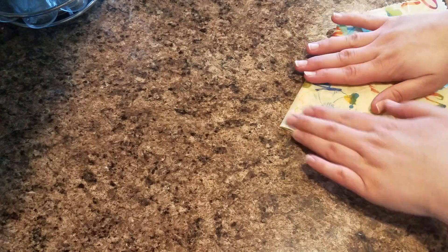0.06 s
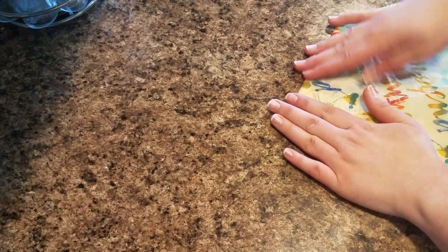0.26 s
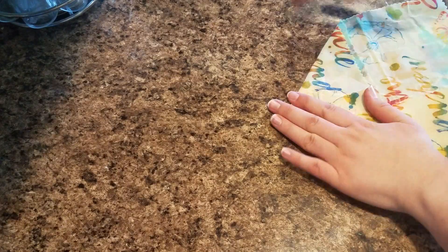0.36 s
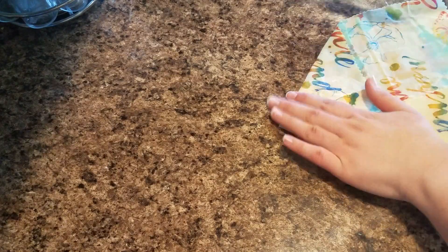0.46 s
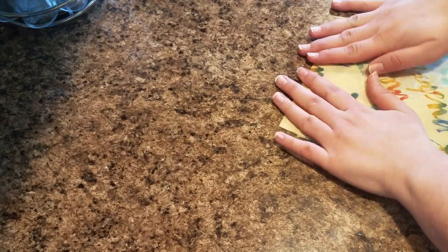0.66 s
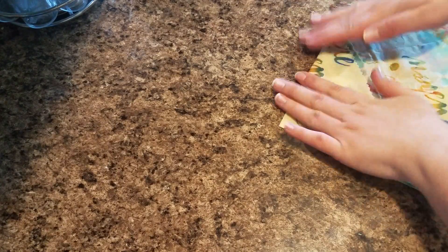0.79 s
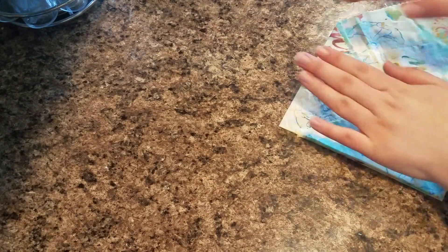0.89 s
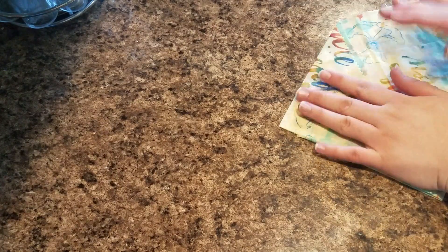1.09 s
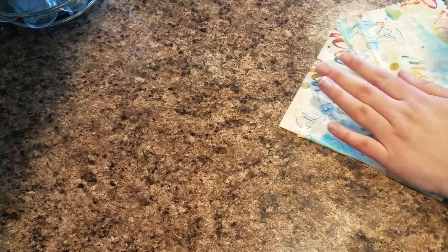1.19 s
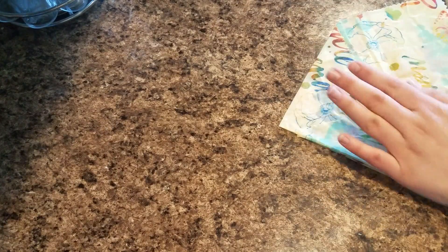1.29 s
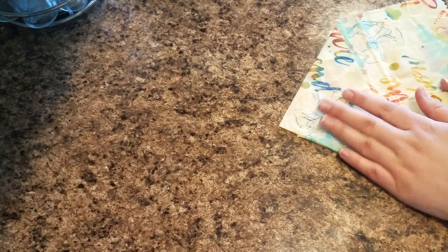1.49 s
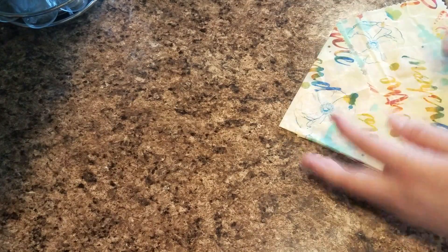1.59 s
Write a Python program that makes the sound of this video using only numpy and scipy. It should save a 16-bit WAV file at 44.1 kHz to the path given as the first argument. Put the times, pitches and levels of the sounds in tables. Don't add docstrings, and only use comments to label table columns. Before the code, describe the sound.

Soft palm thumps and crinkly fingertip ticks on waxed cloth over a kitchen counter, humming room

```python
import sys
import numpy as np
from scipy import signal
from scipy.fft import rfft, irfft, next_fast_len
from scipy.io import wavfile
from scipy.ndimage import uniform_filter1d

SR = 44100
rng = np.random.default_rng(int(sys.argv[2]) if len(sys.argv) > 2 else 0)


def wrap_up_sound(samples):
    columns = np.atleast_2d(samples).T
    tamed = np.clip(columns, -1, 1)
    steps = np.round(tamed * 32767).astype(np.int16)
    wavfile.write(sys.argv[1], SR, steps)


def nominal_scale(level):
    x = np.asarray(level, float) / 20
    return 10 ** x


N = 72765


def unit_rms(x):
    return x / np.sqrt(np.mean(abs(x) ** 2) + 1e-20)


def read_curve(points, hz):
    f, value = np.transpose(points)
    return np.interp(np.log(hz + 1), np.log(f + 1), value)


def add(mix, start_s, sound):
    part = mix[max(round(start_s * SR), 0):][:len(sound)]
    part += sound[:len(part)]


def resonate(x, hz, width_hz):
    r = np.exp(-np.pi * width_hz / SR)
    return signal.lfilter([1 - r, 0, r - 1], [1, -2 * r * np.cos(2 * np.pi * hz / SR), r * r], x)


def colour(x, gain_db):
    size = next_fast_len(2 * N)
    gain = nominal_scale(gain_db(np.fft.rfftfreq(size, 1 / SR)))
    return irfft(rfft(x, size) * gain, size)[..., :N]


# f/Hz, density/dB per Hz
AIR_SPECTRUM = [(22, -33), (60, -1.5), (128, 1), (242, -5.5), (480, -11), (1100, -20), (3000, -31),
                (8000, -43.5)]
# f/Hz, correlation/1
AIR_LIKENESS = [(60, 1), (180, 0.89), (550, 0.12), (1650, -0.085), (4970, -0.15), (15000, 0.039)]


def air():
    level_db, patch_db = -49.5, 1.07
    hz = np.fft.rfftfreq(1024, 1 / SR)
    a, b, c, d, patches = rng.standard_normal((N // 256 + 5, 513, 5)).T
    patches = uniform_filter1d(patches, size=14, axis=0)
    patches = unit_rms(uniform_filter1d(patches, size=10, axis=1))
    same = read_curve(AIR_LIKENESS, hz)[:, None]
    left = a + 1j * b
    right = same * left + np.sqrt(1 - same ** 2) * (c + 1j * d)
    gain = nominal_scale(read_curve(AIR_SPECTRUM, hz)[:, None] + patch_db * patches)
    noise = signal.istft(np.array([left, right]) * gain, nperseg=1024, noverlap=768)[1]
    return nominal_scale(level_db) * unit_rms(noise[:, :N])


# f/Hz, level/dB rms, waver width/Hz, left-right likeness/1
HUM_TONES = [(58.2, -60, 3.1, 1), (119, -50.5, 15.4, 1), (147.4, -56.5, 25, 0.99), (245.2, -74, 7, 0.76),
             (290.8, -60, 13.7, 0.89), (389.2, -62, 26, 0.76), (408.5, -62.5, 1.6, 0.57),
             (477.7, -63.5, 4.1, 0.58), (583.6, -71.5, 6.4, 0.2)]


def hum():
    steady = .75
    t = np.arange(N) / SR
    out = np.zeros((2, N))
    for hz, db, width_hz, same in HUM_TONES:
        r = np.exp(-np.pi * width_hz / SR)
        n = rng.standard_normal((2, 2, 2 * N))
        waver = signal.lfilter([1 - r], [1, -r], n[0] + 1j * n[1])
        waver = signal.lfilter([1 - r], [1, -r], waver)[:, N:]
        phase = np.exp(2j * np.pi * rng.random((2, 1)))
        z = steady * phase + (1 - steady) * unit_rms(waver)
        z[1] = same * z[0] + np.sqrt(1 - same ** 2) * z[1]
        out += nominal_scale(db) * unit_rms((z * np.exp(2j * np.pi * hz * t)).real)
    return out


# t/s, peak level/dB, f/Hz, t60/s
FAR_TAP = (1.6243, -44, 900, .035)


def far_tap():
    rise_s = 0.0042
    start_s, db, hz, t60_s = FAR_TAP
    t = np.arange(SR // 10) / SR
    out = np.zeros(N)
    envelope = nominal_scale(db - 60 * t / t60_s) * np.minimum(t / rise_s, 1)
    add(out, start_s, envelope * 2 * np.sin(2 * np.pi * hz * t))
    return out


# t/s, length/s, level/dB, brightness/dB
STROKES = [(0, 0.048, -59, 5), (0.076, 0.017, -64.5, 2.5), (0.213, 0.034, -58, -0.5),
           (0.24, 0.036, -58.5, -4), (0.275, 0.02, -61, -6), (0.435, 0.011, -57, -6),
           (0.485, 0.013, -72.5, 13), (0.498, 0.017, -62.5, 3.5), (0.553, 0.04, -62, -6),
           (0.637, 0.011, -51, -0.5), (0.654, .022, -53.5, -2.5), (0.753, 0.031, -62.5, -5),
           (0.783, 0.04, -59, -1), (0.97, 0.018, -54, -9), (.979, 0.02, -44.5, -7.5),
           (0.984, 0.018, -56, -12), (1.027, 0.056, -58, -11), (1.199, 0.029, -61, 2.5),
           (1.229, 0.054, -62.5, 2), (1.383, 0.018, -54, -8), (1.4, 0.03, -49.5, -7),
           (1.43, 0.043, -88, -3), (1.533, 0.066, -64, 1)]
# f/Hz, density/dB per Hz
CLOTH_SPECTRUM = [(290, -19), (500, -3.5), (960, -7), (1820, -4.5), (5230, -21), (6320, -24.5),
                  (9760, -16.5), (14900, -25), (16000, -36)]


def skin():
    rise, fall = 0.042, 0.5
    grains_per_s, grain_db, smooth = 2700, 4.5, 0.64
    dull, bright = np.zeros(N), np.zeros(N)
    for start_s, length_s, db, bright_db in STROKES:
        u = np.arange(0, 1, 1 / (length_s * SR))
        shape = nominal_scale(db) * np.minimum(np.minimum(u / rise, 1), (1 - u) / fall)
        add(dull, start_s, shape)
        add(bright, start_s, shape * nominal_scale(bright_db))
    size = nominal_scale(grain_db * np.minimum(rng.exponential(1, (2, N)), 2))
    size = size * (rng.random((2, N)) < grains_per_s / SR)
    grains = rng.standard_normal((2, N)) * (smooth + unit_rms(size))
    cloth = unit_rms(colour(grains, lambda f: read_curve(CLOTH_SPECTRUM, f) - 40 * (f < 450)))
    low = signal.sosfiltfilt(signal.butter(4, 7000, fs=SR, output="sos"), cloth)
    return low * dull + (cloth - low) * bright


# t/s, peak level/dB, start f/Hz, length/s
POCKETS = [(.9815, -41.5, 612, 0.0178), (.988, -34, 317, 0.018), (0.23, -48, 598, 0.024),
           (0.643, -44.5, 580, 0.013), (1.024, -48, 420, 0.0095), (.979, -39, 1195, 0.019),
           (.2115, -47, 1550, .009), (1.3865, -47, 1800, .006), (.697, -40, 70, .04),
           (1.384, -44.5, 574, .015), (1.41, -45, 533, 0.013)]


def pockets():
    fall, roughness, small_hz = 0.72, 0.26, 640
    out = np.zeros(N)
    for start_s, db, hz, length_s in POCKETS:
        n = rng.standard_normal(SR // 20)
        u = np.arange(0, 1, 1 / (length_s * SR))
        slide = 1 - fall * u * min(small_hz / hz, 1) ** 3
        turns = np.cumsum(hz * slide) / SR
        rough = 1 + roughness * unit_rms(uniform_filter1d(n, size=60))[:len(u)]
        swell = np.sin(np.pi * u ** 0.68) ** 2
        add(out, start_s, nominal_scale(db) * swell * rough * np.sin(2 * np.pi * turns))
    return out


# t/s, peak level/dB, colour f/Hz, t60/s
TICKS = [(0.084, -60, 1400, 0.017), (0.125, -46.5, 1770, .03), (0.214, -44, 1450, 0.05),
         (0.2127, -54, 1740, 0.025), (0.2257, -44, 1900, .04), (.232, -46, 1590, .04),
         (0.2162, -40, 3800, 0.024), (0.219, -46, 1830, 0.049), (0.2709, -41.5, 2240, 0.05),
         (.44, -56, 2500, .03), (.219, -52, 540, 0.042), (.487, -53, 3930, 0.052),
         (0.502, -45.5, 1570, 0.022), (0.5548, -52, 1570, 0.082), (0.569, -45.5, 1920, 0.051),
         (0.6401, -36.5, 2670, 0.032), (0.6412, -42, 1350, 0.024), (0.6472, -32, 2600, 0.014),
         (.659, -45.5, 2560, 0.051), (0.664, -48, 2500, .04), (.969, -41.5, 1730, 0.13),
         (0.9816, -37.5, 2500, 0.024), (0.9819, -39, 1070, 0.031), (.988, -38, 2330, 0.027),
         (1.049, -51.5, 1810, 0.033), (1.2082, -63, 2380, 0.043), (1.3828, -39, 914, 0.11),
         (1.3882, -41, 1770, 0.22), (1.393, -45, 4700, 0.025), (1.406, -44, 1730, 0.08),
         (0.9703, -35, 1000, .05), (0.2212, -38, 1030, .05), (0.2704, -40.5, 1210, .03),
         (.5018, -46.5, 1020, .03), (0.567, -51, 1100, 0.038), (0.433, -55, 1197, 0.025),
         (0.4648, -68, 1430, 0.024), (0.5453, -57, 1210, 0.036), (0.7626, -58, 1490, .03),
         (0.649, -58, 5000, .02), (0.675, -49.5, 1980, 0.034), (1.384, -52, 2300, 0.047),
         (1.3904, -53, 2600, 0.045), (1.397, -50, 2100, 0.037), (1.402, -58, 2300, .04),
         (1.409, -40, 1490, .04), (1.4138, -49, 2200, 0.032), (1.03, -58, 3300, .03),
         (1.415, -59, 2920, 0.027), (1.42, -42, 457, 0.26)]


def fingertips():
    relative_width, crisp_hz, soft_hz = .55, 2000, 640
    rustle_db, broad_db, air_db, pad_db = -25, -1, -21, 6
    t = np.arange(SR // 10) / SR
    out = np.zeros(N)
    for start_s, db, hz, t60_s in TICKS:
        rustle = rng.standard_normal(len(t)) ** 3 / 4 * nominal_scale(rustle_db - 60 * t / t60_s)
        drive = rustle + (t == 0)
        sharp = min(hz / crisp_hz, 1)
        ring = resonate(drive, hz, relative_width * max(sharp * hz, soft_hz))
        ring = resonate(ring, hz, 2 * hz)
        broad = nominal_scale(broad_db) * resonate(drive, 3800, 4500)
        broad += nominal_scale(air_db) * resonate(drive, 10000, 7000)
        broad += nominal_scale(pad_db) * resonate(drive, 1100, 800)
        add(out, start_s, nominal_scale(db) * (ring / abs(ring).max() + broad * sharp ** 2))
    return out


# t/s, peak level/dB, ring f/Hz, damping/s
THUMPS = [(.216, -33, 88, .05), (.211, -31, 160, .012), (.2172, -29.5, 160, .012), (.2803, -32, 150, .014),
          (.569, -37, 89, .04), (.6354, -32, 120, .012), (.6437, -21, 120, .013), (.6605, -28, 119, .017),
          (.651, -34, 190, .014), (.712, -36, 118, .025), (.76, -39, 165, .02), (.9865, -20, 100, .02),
          (.9965, -26, 100, .015), (.991, -30, 180, .016), (.985, -37, 50, .04), (1.0405, -27.5, 110, .03),
          (1.077, -38, 108, .02), (1.3945, -35, 140, .018), (1.4168, -29, 125, .013),
          (1.4175, -38, 186, .015), (1.40, -45, 40, .04), (1.642, -34, 120, .012), (1.017, -37, 72, .04),
          (1.478, -39, 116, .025)]


def counter():
    rise_s, after_db, after_t60_s, port_lag_s = .004, -30, .25, .00018
    t = np.arange(SR // 3) / SR
    out = np.zeros(N)
    for start_s, db, hz, damp_s in THUMPS:
        fade = np.exp(-(t / damp_s) ** 2) + nominal_scale(after_db - 60 * t / after_t60_s)
        swell = 1 - np.exp(-t / rise_s)
        add(out, start_s, nominal_scale(db) * swell * fade * np.sin(2 * np.pi * hz * t))
    late = np.interp(np.arange(N) - port_lag_s * SR, np.arange(N), out)
    return np.array([out, late])


# delay/s, left gain/1, right gain/1
ECHOES = [(.00025, 0.0076, 0.14), (.00045, -0.083, 0.27), (.0007, -0.075, 0.1), (.0016, 0.22, -0.37),
          (.0026, 0.31, .2)]


def room(x):
    tail_db, t60_s, port_lag_s = -9, .2, .00005
    size = SR // 2
    taps = np.zeros((2, size))
    at = np.arange(200, size - 20, 20) + rng.integers(0, 20, (2, (size - 201) // 20))
    np.put_along_axis(taps, at, rng.choice([-1., 1.], at.shape), 1)
    taps *= nominal_scale(-60 * np.arange(size) / SR / t60_s)
    taps *= nominal_scale(tail_db) / np.linalg.norm(taps[0])
    for delay_s, left, right in ECHOES:
        taps[:, round(delay_s * SR)] += left, right
    taps[0, 0] = taps[1, round(port_lag_s * SR)] = 1
    return signal.fftconvolve(x, taps, axes=1)[:, :N]


def scene():
    background = air() + hum() + far_tap()
    cloth = room(skin()) + room(fingertips()[None])
    return background + cloth + pockets() + counter()


def top_cut(x):
    return signal.sosfilt(signal.butter(12, 16120, fs=SR, output="sos"), x)


# f/Hz, gain/dB
MIC_RESPONSE = [(3000, 0.8), (4800, -0.5), (6000, -1), (8300, -2), (9500, 3.5), (16000, 6.5)]
# f/Hz, left minus right/dB
MIC_BALANCE = [(60, .7), (150, .2), (500, -.4), (2000, -.5), (5000, .5), (14000, 2)]


def record(dry):
    edge_hz = 15810

    def port(x, side):
        return colour(x, lambda f: read_curve(MIC_RESPONSE, f) + side * read_curve(MIC_BALANCE, f) / 2
                      - 100 * (f > edge_hz))

    mix = np.array([port(dry[0], 1), port(dry[1], -1)])
    return top_cut(mix)


dry = scene()
out = record(dry)
wrap_up_sound(out)
```